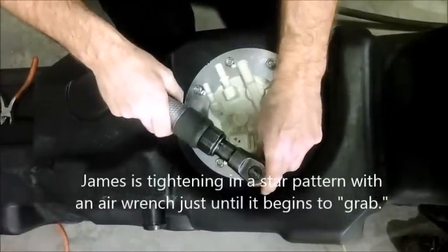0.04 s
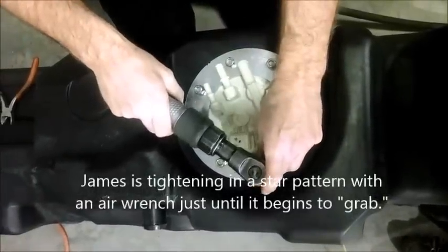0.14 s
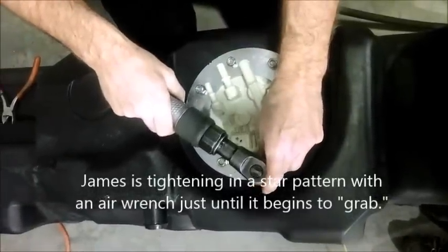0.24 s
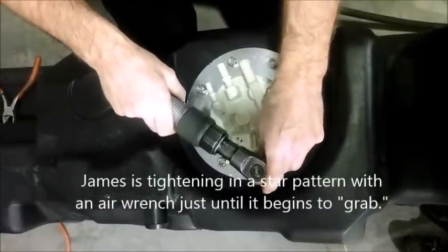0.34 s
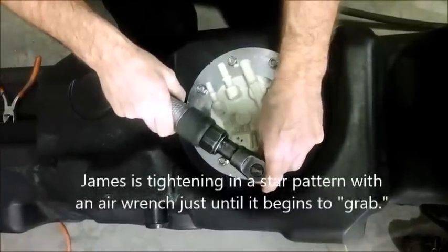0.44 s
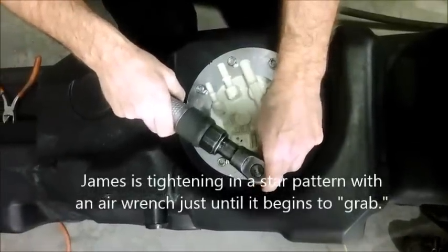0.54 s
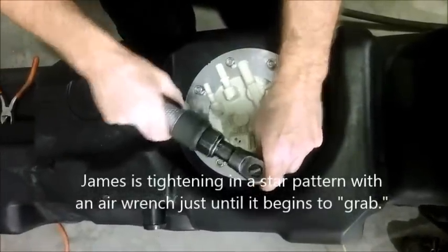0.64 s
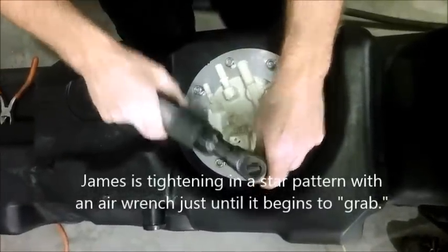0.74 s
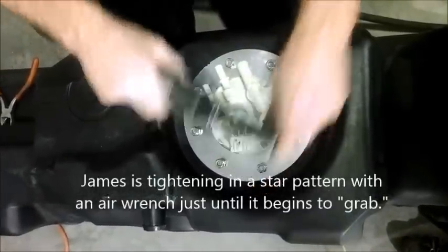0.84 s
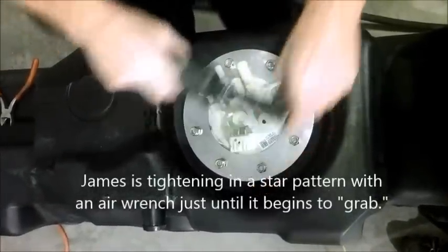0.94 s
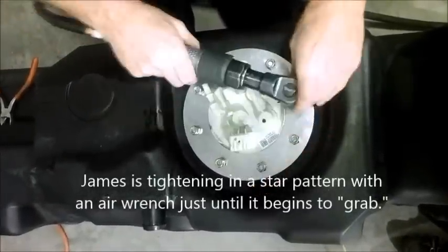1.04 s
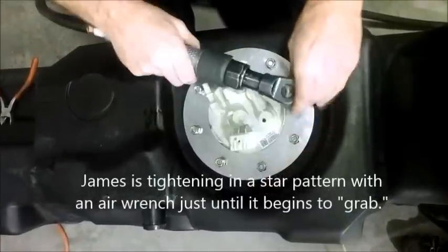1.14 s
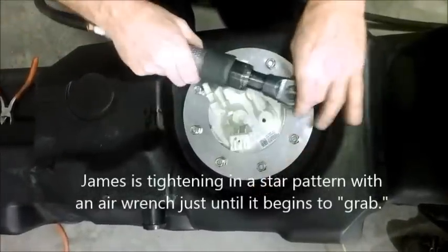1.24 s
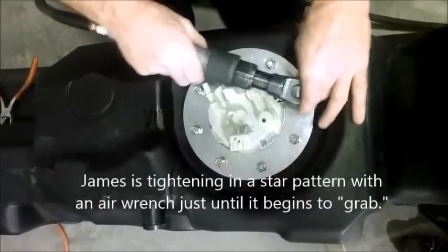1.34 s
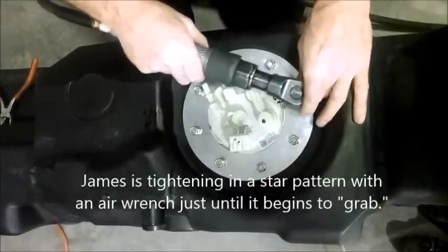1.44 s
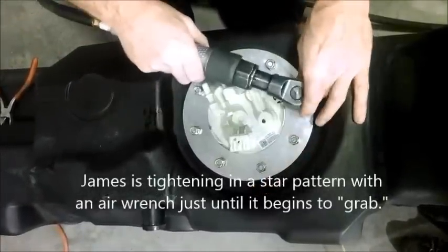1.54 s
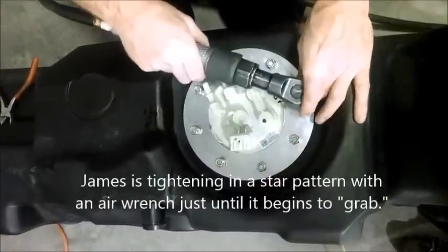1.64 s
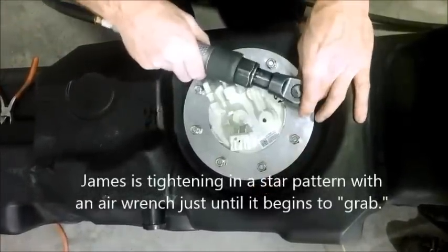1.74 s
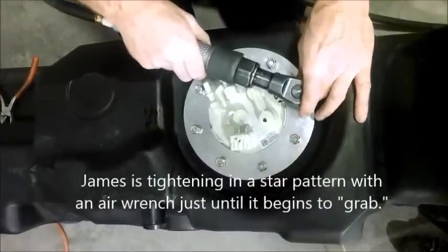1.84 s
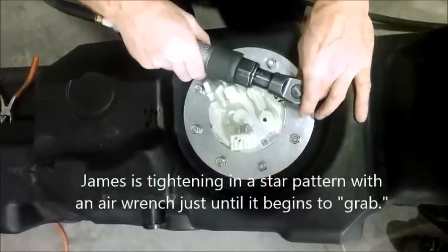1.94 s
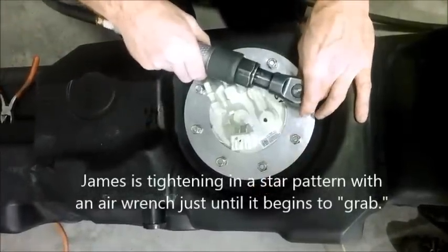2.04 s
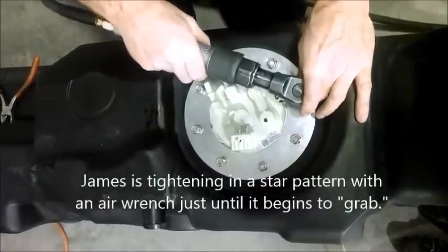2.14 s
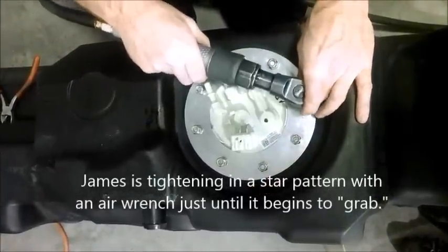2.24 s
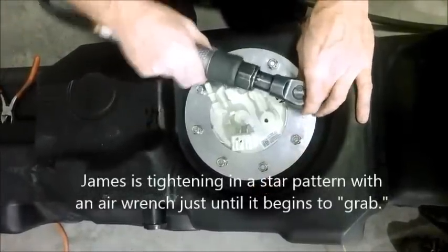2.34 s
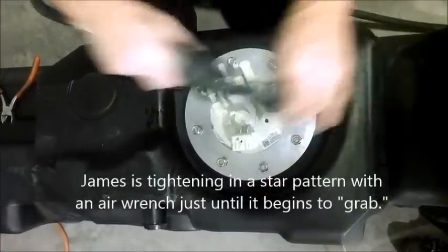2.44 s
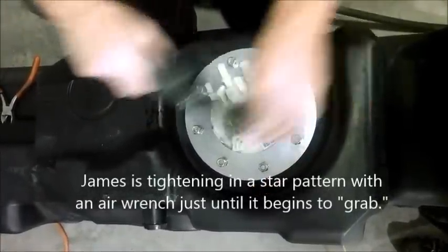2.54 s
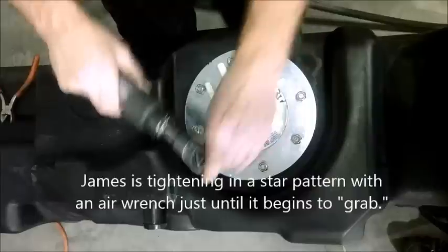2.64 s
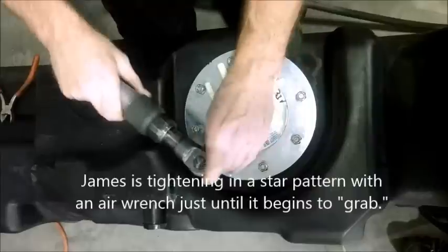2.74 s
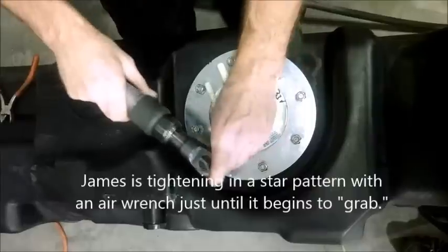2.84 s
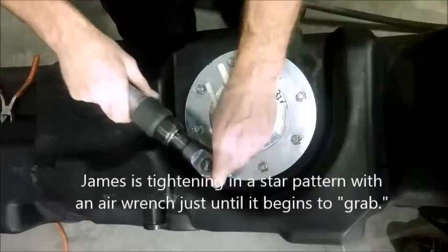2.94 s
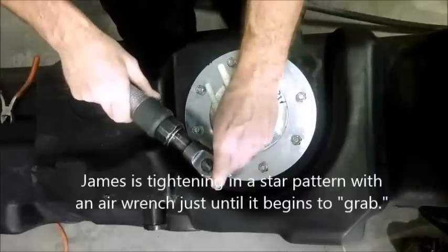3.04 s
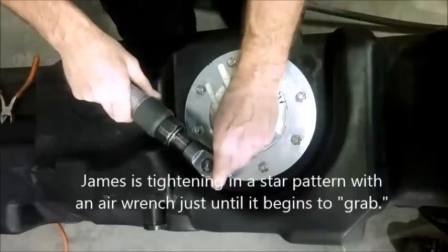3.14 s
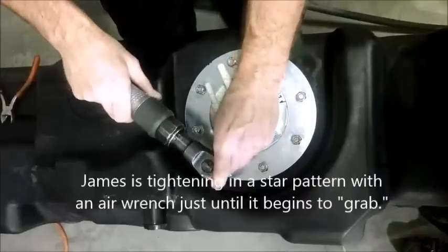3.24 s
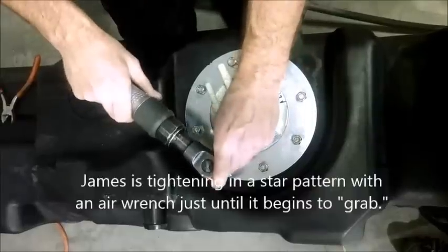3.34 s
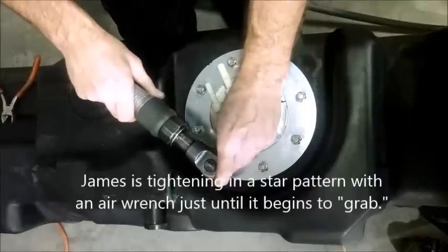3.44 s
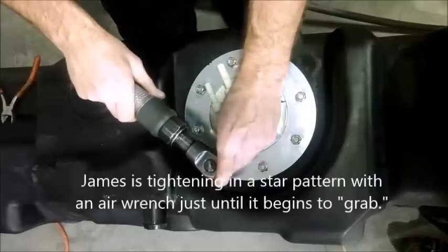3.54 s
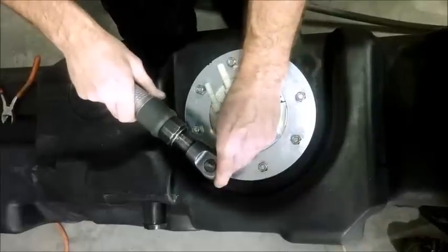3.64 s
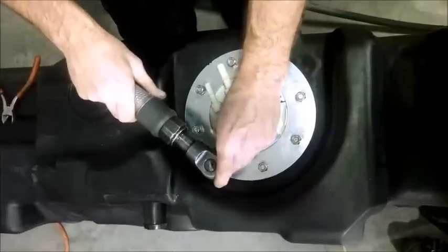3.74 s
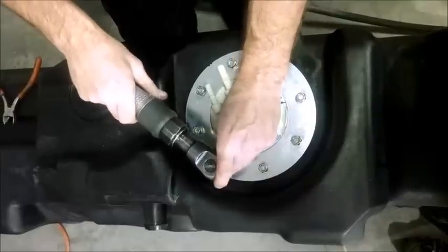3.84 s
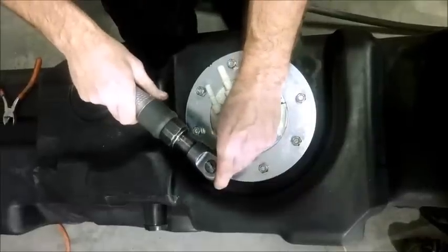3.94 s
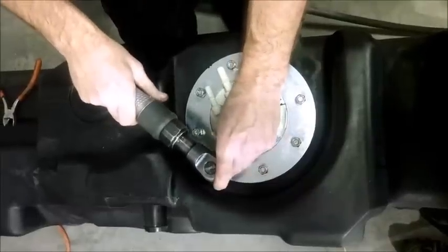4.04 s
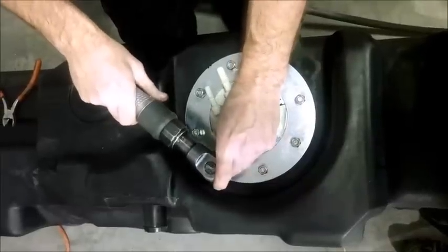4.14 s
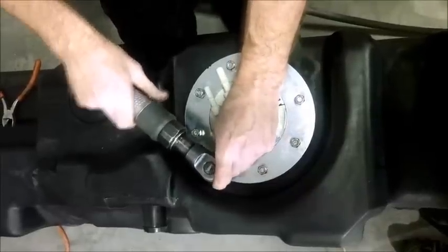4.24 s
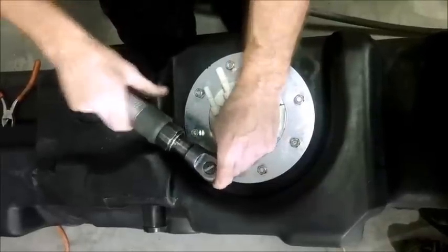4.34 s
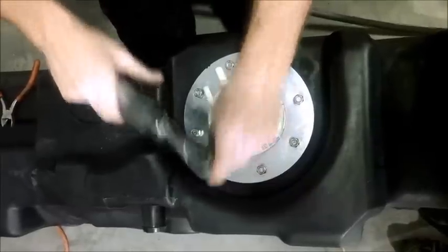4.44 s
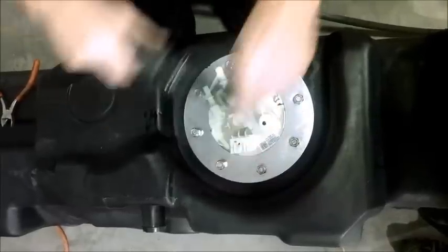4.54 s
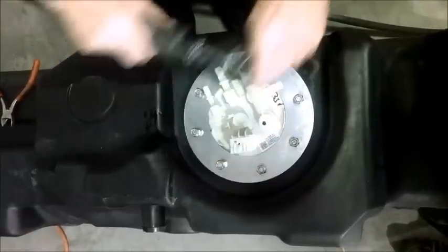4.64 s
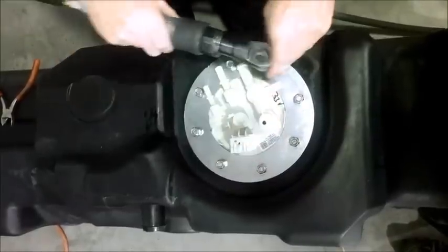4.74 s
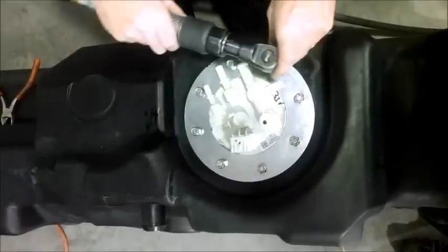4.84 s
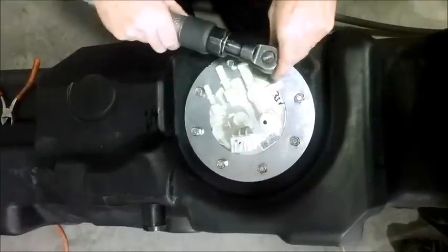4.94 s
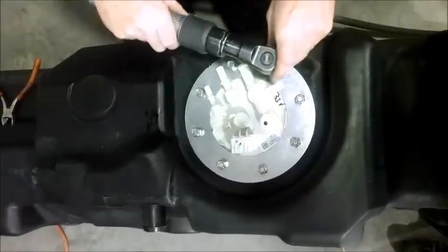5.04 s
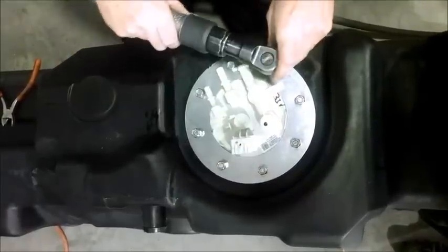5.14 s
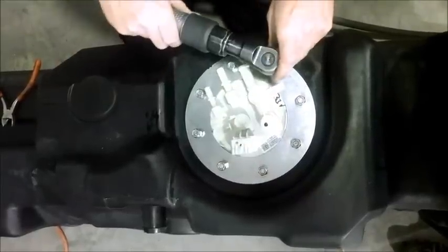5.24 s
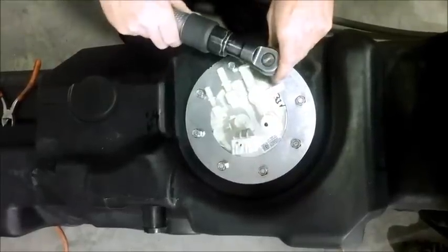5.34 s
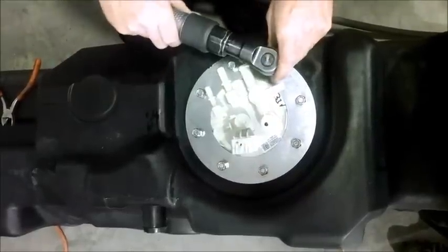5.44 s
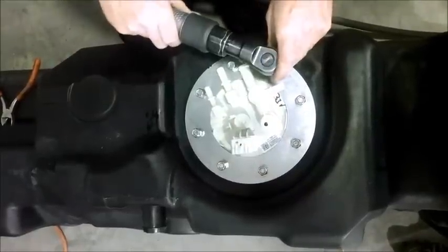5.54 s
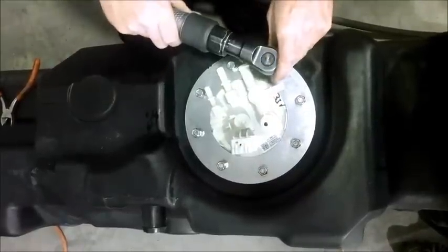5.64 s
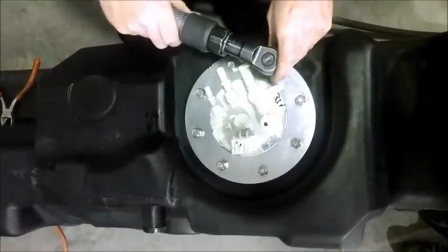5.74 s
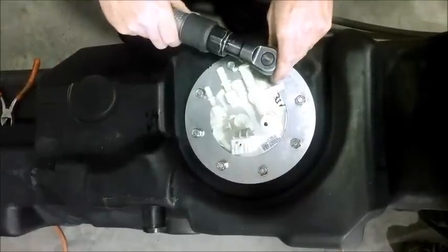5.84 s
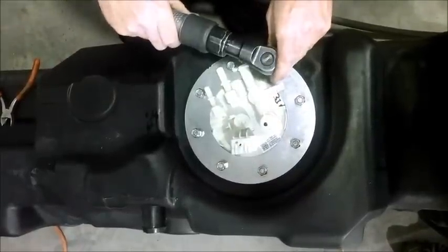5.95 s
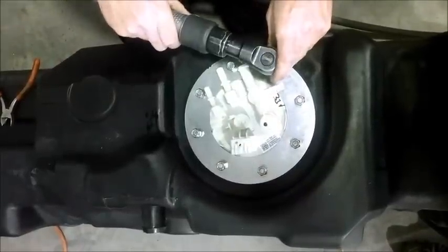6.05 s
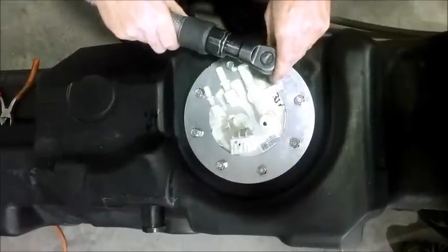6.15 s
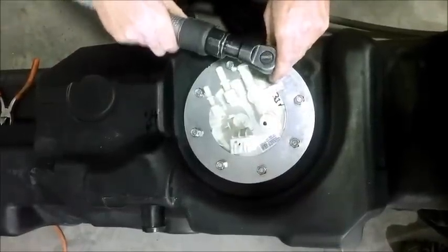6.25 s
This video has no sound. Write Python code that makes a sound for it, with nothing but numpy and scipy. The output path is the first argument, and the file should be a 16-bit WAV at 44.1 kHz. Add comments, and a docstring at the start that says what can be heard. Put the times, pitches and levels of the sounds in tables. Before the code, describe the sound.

An air ratchet tightens four bolts in separate runs, each a loud hiss and high whine that sags as the bolt grips, close up in a workshop.

```python
"""An air ratchet runs down four bolts on the flange of a plastic fuel tank, close to a microphone in a
workshop. Each trigger squeeze makes exhaust hiss, noise puffed by the vanes, while the motor's tone whines up,
then sags as the bolt grips; after the first three runs loose vanes flutter to rest. The first run is already
under way and the last is cut off by the end while still running. Stroke impulses knock faintly into the tank's
resonances, low noise gusts brush the microphone's two ports, and a small air leak hisses over a wavering hum
throughout."""
import sys
import numpy as np
from scipy import signal
from scipy.fft import rfft, irfft
from scipy.io import wavfile

SR = 44100
rng = np.random.default_rng(int(sys.argv[2]) if len(sys.argv) > 2 else 0)


def inscribe(sig):
    """Save sig as 16-bit PCM at rate SR to the path in sys.argv[1].

    A 1-D sig is mono; a 2-D sig holds one channel per row.
    Samples are clipped to [-1, 1] before scaling.
    """
    pcm = np.round(np.clip(np.atleast_2d(sig).T, -1, 1) * 32767)
    wavfile.write(sys.argv[1], SR, pcm.astype(np.int16))


N = 277389
TIME = np.arange(N) / SR
FREQ = np.maximum(np.arange(N // 2 + 1) * SR / N, 1)

FREE_HZ = 1134  # vane rate with no load
VANES_PER_STROKE = 22.8  # vanes passed per drive stroke of the ratchet
START_DELAY_S, SPIN_UP_SHARE = .02, .92  # the motor starts late and rises over this share of the valve's opening time
FREEWHEEL_SHARE, FREEWHEEL_S = .28, 0.1  # below this share of its speed the rotor runs out freely
OPEN_POWER, CLOSE_POWER = 2.47, 2.55  # hiss amplitude as a power of the valve's opening and of the draining pressure
FLAP_SHARE, FLAP_RISE_S = .53, 0.0068  # the vanes come loose below this share of the pressure
UNSEAL_DB, UNSEAL_S = -11.5, 0.039  # the whine collapses just as the vanes come loose
THREAD_DB, THREAD_HZ = 1.5, 4  # uneven thread friction: spread, upper limit of its wander


def undb(db):
    """Decibels to gain."""
    return 10 ** (np.asarray(db) / 20)


def across(points, column=1):
    """One column of a table, interpolated along its first column on a log-frequency axis."""
    points = np.array(points)
    return np.interp(np.log(FREQ), np.log(points[:, 0]), points[:, column])


def noise():
    """White noise."""
    return rng.standard_normal(N)


def unit(x):
    """Scale to rms 1."""
    return x / np.sqrt(np.mean(x ** 2))


def shape(x, response):
    """Filter by a frequency response."""
    return irfft(rfft(x) * response, N)


def per_band(response, band):
    """Scale a response so that white noise comes out with rms 1 within the band."""
    inside = (FREQ > band[0]) & (FREQ < band[1])
    return response / np.sqrt(np.mean(inside * response ** 2))


def resonance(hz, width):
    """Response of one damped resonance, gain 1 at its centre."""
    return 1 / (1 + 1j * (FREQ ** 2 - hz ** 2) / (FREQ * width))


def body(modes):
    """Response of a set of resonances."""
    return sum(undb(db) * resonance(hz, width) for hz, width, db in modes)


def walk(rate):
    """Smooth random wander of rms 1, mostly slower than the given rate in Hz."""
    return unit(shape(noise(), 1 / (1 + (FREQ / rate) ** 4)))


def ramp(start, length):
    """Rise from 0 to 1 over a length of time."""
    return np.clip((TIME - start) / length, 0, 1)


def pulses(turns, scatter_db):
    """One uneven impulse at each whole turn."""
    passed = np.diff(np.floor(turns), prepend=0) > 0
    return passed * undb(scatter_db * noise())


def ports(direct, diffuse):
    """Spread a sound and its scattered twin over two ports that hear some bands in step, others opposed."""
    # how the ports differ: (frequency [Hz], side minus mid [dB], left lead [-1 to 1])
    port_table = [(40, 17, 0.93), (250, 0, 0.76), (700, -8.5, -0.17), (1430, -19.5, 0.5), (1990, -11, 0.4),
                  (2615, -1.5, 0.81), (2800, 6.5, .3), (3200, 44, -0.19), (3197, 2, -0.53),
                  (4420, -6.5, 0.93), (6450, 2, -0.51), (6970, -1.5, .8), (10250, -1, -.7), (11270, 5, .8),
                  (12250, -6, -.6), (13270, -0.5, .8), (13800, 20, -0.076), (14300, 3, -.6),
                  (15100, 6, -.7), (15300, -7, 0)]
    ratio = undb(across(port_table))
    lead = np.clip(across(port_table, column=2), -1, 1)
    mid_gain = 1 / np.hypot(1, ratio)
    mid = shape(direct, mid_gain)
    side_spectrum = 1j * lead * rfft(direct) + np.sqrt(1 - lead ** 2) * rfft(diffuse)
    side = irfft(side_spectrum * ratio * mid_gain, N)
    return np.array([mid + side, mid - side])


def motor_speed(pressed, opening, released, braking, sag):
    """Vane rate: spins up as the valve opens, sags on the bolt, brakes as the air drains, then freewheels."""
    spin_up = np.tanh(np.maximum(TIME - pressed - START_DELAY_S, 0) / (SPIN_UP_SHARE * opening))
    freed = released + braking * (1 - FREEWHEEL_SHARE)
    freewheel = FREEWHEEL_SHARE * np.exp(-np.maximum(TIME - freed, 0) / FREEWHEEL_S)
    return (FREE_HZ - sag) * spin_up * np.maximum(1 - ramp(released, braking), freewheel)


def rotor(rate, load, jitter=.004, drag_db=6):
    """Count of vanes passed; under load the rotor slows and recovers within each drive stroke."""
    rate = rate * (1 + jitter * walk(27))
    strokes = np.cumsum(rate) / SR / VANES_PER_STROKE
    drag = load * undb(drag_db) * np.sin(2 * np.pi * strokes)
    return np.cumsum(rate * (1 - drag)) / SR


def exhaust(flow, swell, jet, hollows, turns, gain_db=3, vane_depth=0.2, stroke_depth=0.024, flutter_db=0.43,
            shift_db=1.66, treble_swell=0.47):
    """Turbulent air leaves the port in puffs, one per vane, and colours itself in the hollows round the hand."""
    hollow_db = sum(db * abs(resonance(hz, width)) ** 2 for hz, width, db in hollows)
    colour = per_band(undb(across(jet) + hollow_db), (4000, 13000))
    vane_puffs = vane_depth * np.cos(2 * np.pi * turns)
    stroke_puffs = stroke_depth * np.cos(2 * np.pi * turns / VANES_PER_STROKE)
    puffs = 1 + vane_puffs + stroke_puffs
    air = ports(shape(noise() * puffs, colour), shape(noise() * puffs, colour))
    # the jet wanders over the hand; low and high hiss drift on their own
    low = shape(air, 1 / (1 + (FREQ / 5000) ** 4))
    high = air - low
    low_db = swell + shift_db * walk(1.17)
    high_db = treble_swell * swell + shift_db * walk(1.7) / 2
    air = low * undb(low_db) + high * undb(high_db)
    return air * flow * undb(gain_db + flutter_db * walk(32))


def whine(rate, gain, grip, turns, rough=0.14, grip_rough=1.0, slow_rough=0.94, second_db=-16, third_db=-22,
          side_db=-17):
    """The vanes chop the air into a wavering tone; below full speed and under strain it turns ragged."""
    # loudness at each motor speed, before the run's own gain: (vane rate [Hz], level [dB])
    loudness = [(100, -58), (230, -32.5), (330, -31), (560, -23.5), (820, -29.5), (1020, -32), (1090, -30),
                (1140, -28.5)]
    slowness = 1 - rate / FREE_HZ
    phase = 2 * np.pi * turns + slow_rough * slowness * walk(137) + grip_rough * grip * walk(35)
    tone = np.sin(phase) + undb(second_db) * np.sin(2 * phase) + undb(third_db) * np.sin(3 * phase)
    side = undb(side_db) * np.cos(phase)
    level = gain * undb(np.interp(rate, *np.array(loudness).T)) * (rate > 0)
    return np.array([tone + side, tone - side]) * np.sqrt(2) * level * (1 + rough * walk(66))


def ratchet(rate, load, turns, return_db=-4, tick_db=-6, side_db=-5, soft_hz=900):
    """Each drive stroke and its weaker return knock the tank; the pawl ticks along."""
    # resonances of tank and flange: (frequency [Hz], width [Hz], relative level [dB])
    tank_modes = [(98.7, 21, 0.5), (210.5, 14.4, 7), (245, 26, 8.5), (289, 65, 5), (403, 120, -7),
                  (491, 96, 10), (660, 99, -25)]
    strokes = turns / VANES_PER_STROKE
    knocks = pulses(strokes, scatter_db=1.8) + undb(return_db) * pulses(strokes + .5, scatter_db=3.5)
    knocks = knocks * np.sqrt(SR * VANES_PER_STROKE / FREE_HZ) * load * rate / FREE_HZ
    # the rubber gasket softens each blow
    tank = body(tank_modes) / (1 + 1j * FREQ / soft_hz)
    thud = shape(knocks, tank / np.sqrt(np.mean(abs(tank) ** 2)))
    tick = undb(tick_db) * shape(knocks, resonance(9500, 2500))
    # a delayed copy of the thud, opposed at the two ports
    side = undb(side_db) * np.roll(thud, int(0.00364 * SR))
    return (thud + tick + np.array([side, -side])) * (rate > 0)


def workshop(leak_db=-38.5, hum_hz=97.5, hum_db=-68.5):
    """The steady air leak, as coloured noise, and a low machine hum wavering in pitch and level."""
    # air leak over the workshop's own rumble: (frequency [Hz], relative density [dB per Hz])
    leak_colour = [(30, -11), (60, -17), (150, -7.5), (500, -9.5), (1500, -5.5), (2200, -3), (4500, 1),
                   (7000, 4), (10000, 2), (14000, 2.5), (15500, 3.5)]
    colour = per_band(undb(across(leak_colour)), (0, SR))
    leak = ports(shape(noise(), colour), shape(noise(), colour))
    hum = np.sin(2 * np.pi * np.cumsum(hum_hz + 2 * walk(5.2)) / SR) * undb(2 * walk(3))
    return undb(leak_db) * leak + undb(hum_db) * hum


def gusts(blowing, length_s=0.022, gain_db=-2.5, mid_db=-15, eddy_db=-59, eddy_spread_db=4):
    """Spent air buffets the microphone ports in short swells and small random eddies, mostly in opposition."""
    # strongest gusts, before the common gain: (time [s], level [dB])
    strongest = [(.03, -46), (.455, -37), (.75, -32), (3.02, -41), (3.27, -37), (3.35, -35), (3.679, -35),
                 (4.05, -39), (4.15, -33)]
    # colour of the gusts: (frequency [Hz], relative density [dB per Hz])
    gust_colour = [(12, -14), (35, -6.5), (70, -1.5), (160, -15.5), (400, -12), (1500, -58)]
    colour = per_band(undb(across(gust_colour)), (20, 70))
    mid, side = undb(mid_db) * shape(noise(), colour), shape(noise(), colour)
    swells = sum(undb(db) * np.exp(-((TIME - at) / length_s) ** 2 / 2) for at, db in strongest)
    eddies = blowing * undb(eddy_db + eddy_spread_db * walk(6))
    return np.array([mid + side, mid - side]) * (swells * undb(gain_db) + eddies)


def coasting(start, db, decay, turns, air_db=-19):
    """With the air shut off, single vane flaps ring the housing ever more slowly."""
    # resonances of the motor housing: (frequency [Hz], width [Hz], relative level [dB])
    housing_modes = [(750, 210, 27), (940, 73, 8), (1650, 500, -35)]
    housing = body(housing_modes)
    flaps = shape(pulses(turns, scatter_db=4.5), housing)
    gain = undb(db) * ramp(start, FLAP_RISE_S) * np.exp(-np.maximum(TIME - start - FLAP_RISE_S, 0) / decay)
    # bring the flaps to rms 1 over the stretch where they sound
    flaps = flaps / np.sqrt(np.average(flaps ** 2, weights=gain ** 2) + 1e-12)
    return gain * (flaps + undb(air_db) * unit(shape(noise(), housing)))


def clicks(side_db=-5):
    """Decaying noise bursts: the trigger valve pops, air squeaks and the steel pawl snaps into place."""
    # valve pops, a squeak of air and pawl clicks:
    # (time [s], starting level [dB], ring [Hz], width [Hz], decay [s])
    strikes = [(.855, -34, 9800, 900, .003), (0.888, -29.5, 9800, 900, .0027),
               (1.132, -31, 1200, 1800, 0.0082), (1.162, -19, 5400, 450, 0.025),
               (2.56, -32, 9500, 900, .003), (2.578, -40, 9400, 900, 0.0033),
               (2.797, -33.5, 930, 1400, 0.034), (4.516, -33, 3000, 3000, 0.0046),
               (4.808, -33, 1003, 1200, 0.051)]
    out = np.zeros((2, N))
    for start, db, hz, width, decay in strikes:
        strike = undb(db) * np.exp(-abs(TIME - start) / decay) * (TIME >= start)
        mid, side = (unit(shape(noise(), resonance(hz, width))) for _ in range(2))
        out += strike * (mid + undb(side_db) * np.array([side, -side]))
    return out


def room(x, t60_s=0.36, wet_db=-15, bounce_s=.0026, bounce_db=-17):
    """One quick treble bounce off the tank top, then a short, dull echo from floor and benches."""
    bounce = shape(x, np.exp(-2j * np.pi * FREQ * bounce_s) * FREQ / np.hypot(FREQ, 2500))
    tails = np.array([noise(), noise()]) * undb(-60 * TIME / t60_s) * (TIME > .006)
    tails /= np.sqrt(np.sum(tails ** 2, axis=1, keepdims=True))
    echo = signal.fftconvolve(x, tails, axes=1)[:, :N]
    return x + undb(bounce_db) * bounce + undb(wet_db) * shape(echo, 1 / np.hypot(1, FREQ / 1500))


def scene():
    """Four runs: the trigger sets air flow and speed, the bolt the load; one rotor angle per run drives its layers."""
    # one squeeze of the trigger per bolt: (pressed [s], opening time [s], released [s], braking time [s],
    # relative hiss level [dB], mid-run swell of the low hiss [dB], whine gain at full speed [dB])
    runs = [(-.3, 0.038, 0.77, 0.065, -17, -0.2, -6), (1.121, 0.033, 2.484, .088, -20, 3.4, -2),
            (2.79, .046, 4.426, .077, -19.5, 2.6, -1), (4.802, .048, 6.44, .08, -20, -0.8, -4.5)]
    # each bolt begins to grip: (time [s], spread [s], motor sag [Hz], whine change at full speed [dB],
    # relative knock level when free [dB], and when tight [dB], final tightening [s])
    grips = [(.58, 0.085, 67.24, 6, -51.5, -45.5, .3), (2.16, .1, 109.7, -2, -51, -38.5, .25),
             (4.03, .08, 122.8, -3, -52, -39.5, 0.65), (6.22, 0.081, 167.3, -2, -46, -31.5, 0.45)]
    # exhaust colour at each bolt, as the port points a new way: (frequency [Hz], relative density [dB per Hz])
    jets = [
        [(100, -17.5), (250, -17), (500, -16), (900, -5.5), (1350, -6), (1900, -5.5), (2400, -3.5),
         (3000, -4.5), (4000, -0.5), (5200, 0.5), (6100, -3.5), (8000, -0.5), (11000, -1), (15500, -7)],
        [(100, -24), (250, -14), (500, -11.5), (900, -4), (1350, -8), (1900, -2), (2400, -2.5), (3000, -8),
         (4000, 3), (5200, -2.5), (6100, -3), (8000, 0), (11000, -2), (15500, -5)],
        [(100, -14.5), (250, -13.5), (500, -11), (900, -1.5), (1350, -4.5), (1900, 1), (2400, 4), (3000, -4),
         (4000, -2.5), (5200, 3.5), (6100, -0.5), (8000, 0), (11000, 2), (15500, -5)],
        [(100, -20), (250, -12.5), (500, -11), (900, -9), (1350, -9.5), (1900, -9), (2400, -7.5), (3000, -8),
         (4000, -1), (5200, 3.5), (6100, -2), (8000, -0.5), (11000, -1), (15500, -3.5)],
    ]
    # hollows between hand and tank that boost or swallow part of the hiss, one list per bolt:
    # (frequency [Hz], width [Hz], gain [dB])
    hollows = [
        [(1540, 180, 7), (6970, 1140, 3.5), (9000, 790, -3.5)],
        [(1954, 25, 8), (2400, 130, 6.5), (3337, 60, 11.5), (12200, 600, 1.5)],
        [(2140, 110, 1), (3750, 370, 5), (6130, 350, -5.5), (7240, 800, 1.5), (9000, 630, -2.5)],
        [(3610, 39, 10), (8700, 440, 3), (10050, 540, 4)],
    ]
    # vanes flapping in the housing as the motor coasts after a run: (level [dB], decay [s])
    coasts = [(-28, 0.043), (-27.5, 0.037), (-20.5, 0.0057)]
    # the hiss dips briefly, its treble less: (time [s], half length [s], change of the low hiss [dB])
    dip_table = [(1.204, 0.041, -3), (1.437, 0.028, -3.3), (1.783, 0.037, -3.5)]

    tool, blowing = clicks(), 0
    dips = sum(db * np.exp(-((TIME - at) / length) ** 2 / 2) for at, length, db in dip_table)
    for k, (pressed, opening, released, braking, hiss_db, swell_db, whine_db) in enumerate(runs):
        grips_at, spread, sag_hz, strain_db, free_db, tight_db, tightening = grips[k]
        grip = (1 + np.tanh((TIME - grips_at) / spread / 2)) / 2
        tightness = np.sin(np.pi / 2 * ramp(released - tightening, tightening))
        load = undb(free_db + (tight_db - free_db) * tightness + THREAD_DB * walk(THREAD_HZ))
        rate = motor_speed(pressed, opening, released, braking, sag_hz * grip)
        turns = rotor(rate, load)
        flow = ramp(pressed, opening) ** OPEN_POWER * (1 - ramp(released, braking)) ** CLOSE_POWER
        swell = swell_db * np.sin(np.pi * ramp(pressed, released - pressed)) + dips
        loose = released + braking * (1 - FLAP_SHARE)
        fade_db = UNSEAL_DB * ramp(loose - UNSEAL_S / 2, UNSEAL_S)
        whine_gain = undb((whine_db + strain_db * grip) * rate / FREE_HZ + fade_db)
        tool += exhaust(flow * undb(hiss_db), swell, jets[k], hollows[k], turns)
        tool += whine(rate, whine_gain, grip, turns)
        tool += ratchet(rate, load, turns)
        if k < len(coasts):
            tool += coasting(loose, *coasts[k], turns)
        blowing = blowing + flow
    return room(tool) + gusts(blowing) + workshop()


def record(dry):
    """The two ports differ a little in colour; the highest peaks are rounded and the top is cut."""
    # difference between the ports: (frequency [Hz], left minus right [dB])
    balance_table = [(200, 2), (600, -2), (1200, -0.5), (2400, 0.5), (3900, -2), (5500, 1), (7200, -1),
                     (8600, 1), (10000, 0), (15000, 0)]
    balance = across(balance_table) / 2
    heard = shape(dry, undb(np.array([balance, -balance])))
    rounded = heard / (1 + (heard / .9) ** 8) ** (1 / 8)
    # steep cut at 15520 Hz
    return shape(rounded, 1 / np.sqrt(1 + (FREQ / 15520) ** 700))


dry = scene()
out = record(dry)
inscribe(out)
```